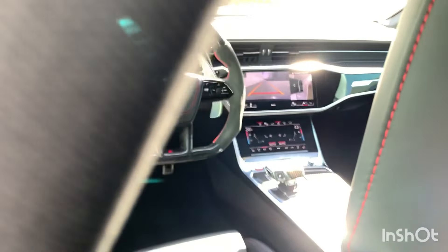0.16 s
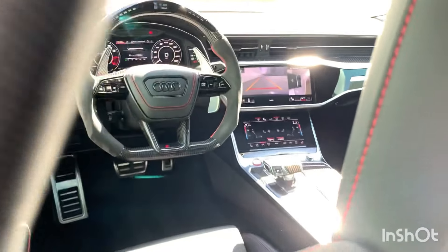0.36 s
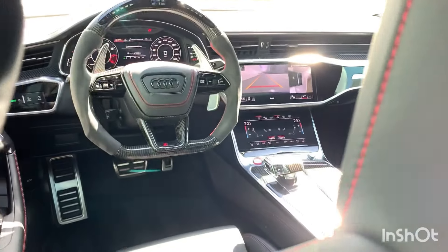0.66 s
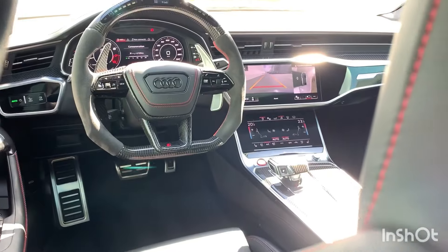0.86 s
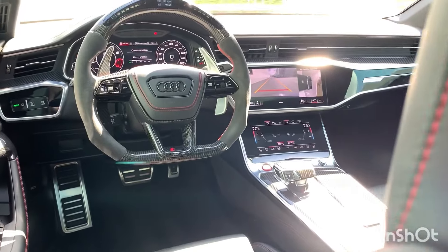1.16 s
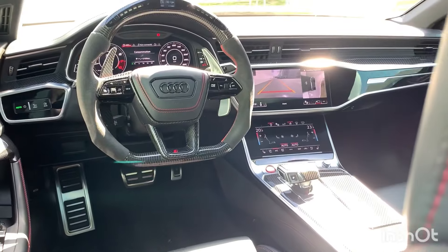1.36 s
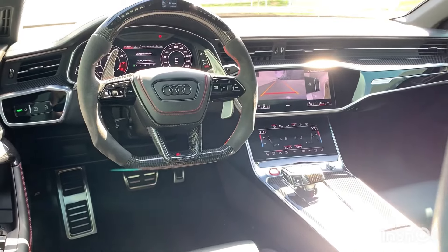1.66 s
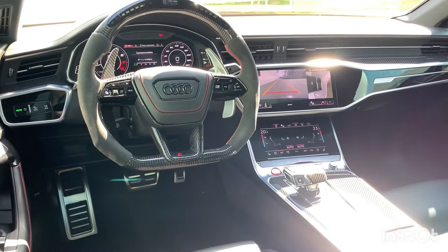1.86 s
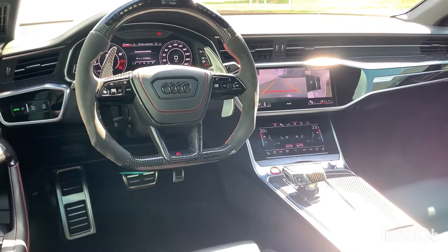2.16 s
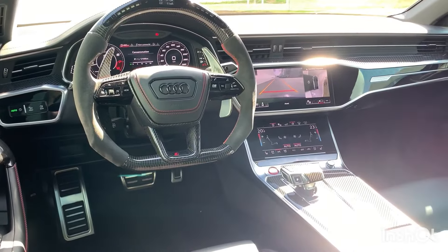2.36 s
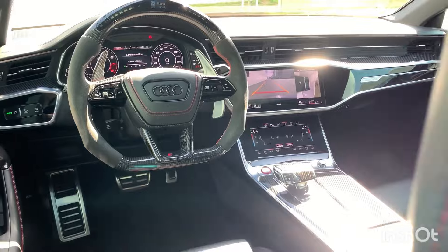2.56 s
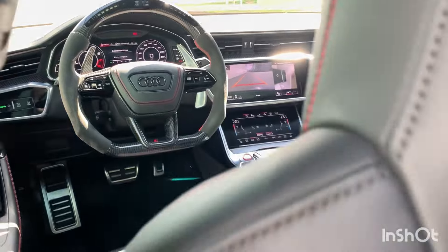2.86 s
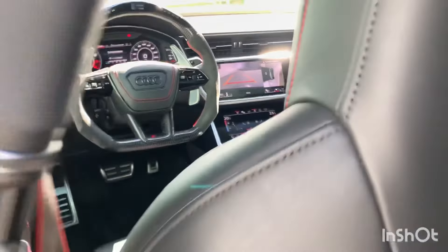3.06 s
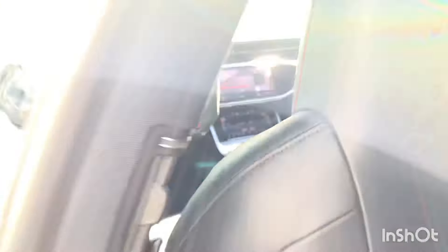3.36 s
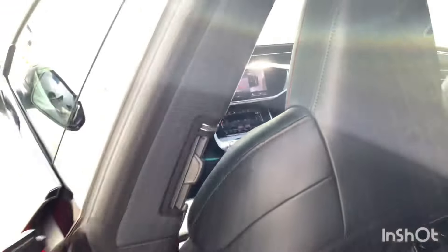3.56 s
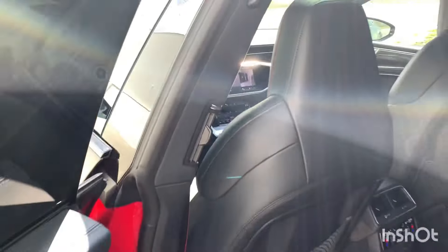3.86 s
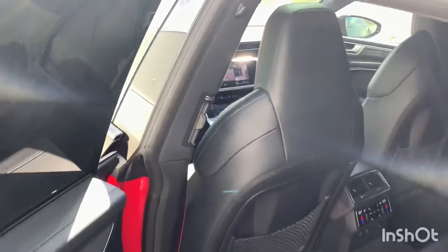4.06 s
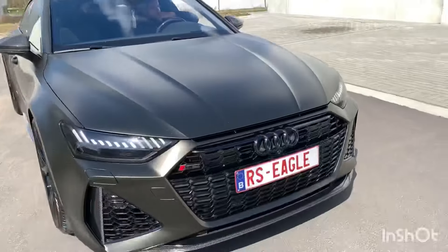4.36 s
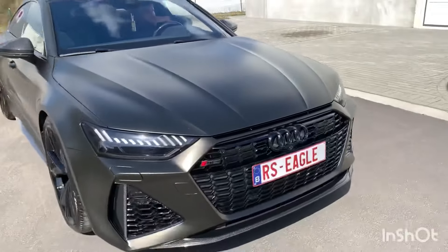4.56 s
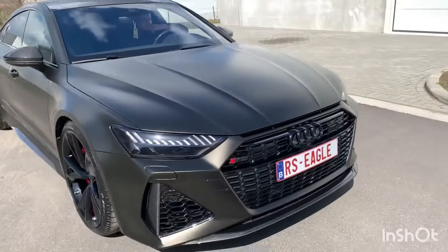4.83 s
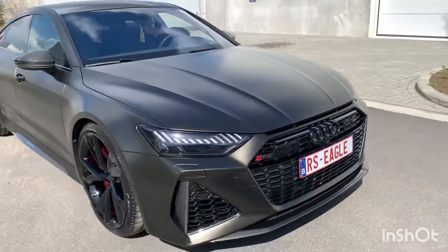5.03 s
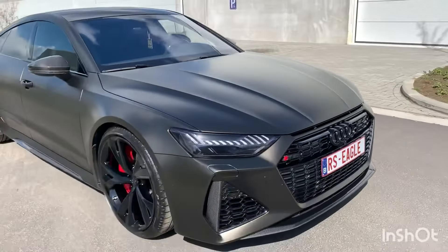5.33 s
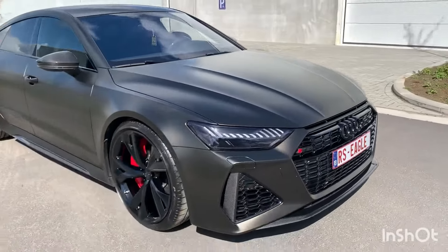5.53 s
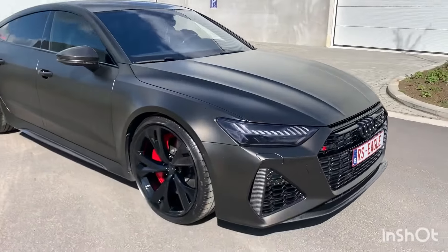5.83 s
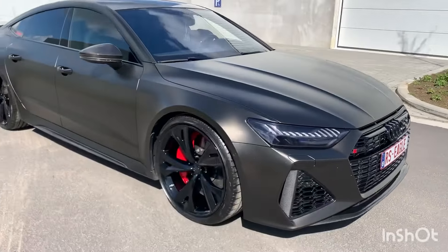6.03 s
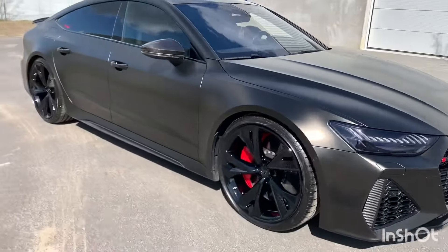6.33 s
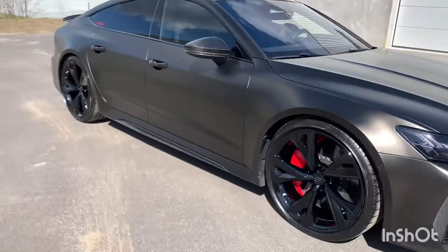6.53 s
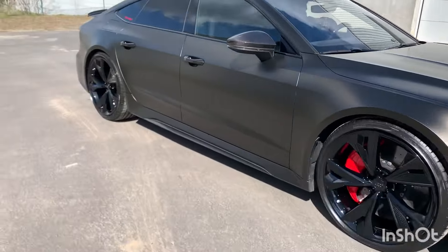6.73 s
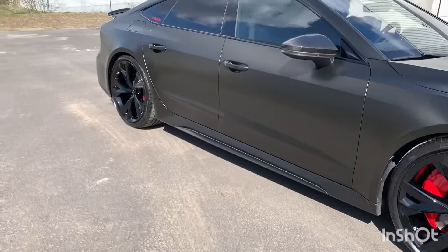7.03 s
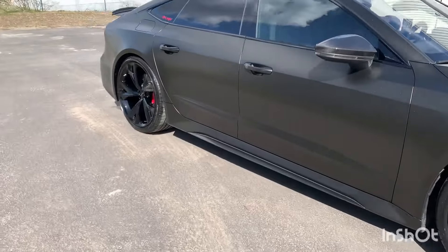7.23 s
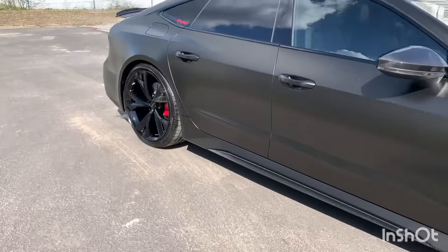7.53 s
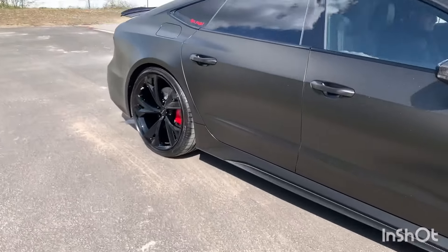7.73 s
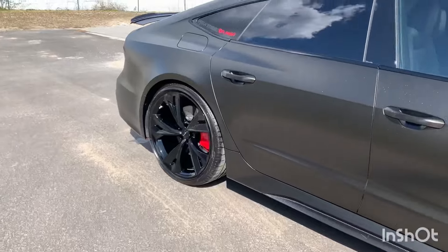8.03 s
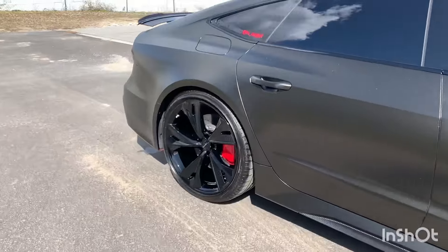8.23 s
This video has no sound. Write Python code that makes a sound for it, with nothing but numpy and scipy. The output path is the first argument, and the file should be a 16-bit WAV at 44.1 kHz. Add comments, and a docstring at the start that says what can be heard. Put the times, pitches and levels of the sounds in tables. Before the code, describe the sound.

A powerful eight-cylinder car idles throughout. First it is heard inside the cabin by the open door: low, boomy, loping burble, faint trim buzz, soft handling bumps and seat rustles. After a thump and hard cut at about four seconds, the close microphone is outside, walking from bonnet to rear wheel, with faster, louder exhaust throb, metallic clatter, hiss and late chattering metal.

```python
"""A V8 idles with a loping burble, heard in its cabin with the door open; after a hard cut it idles faster,
heard outside along a walk from the bonnet to the rear wheel. Beating exhaust orders make the burble; gas noise
and clatter, both shaped noise, surge with it; injectors and valve gear ring at the firings. Trim buzz and
rustles join in the cabin, soft bumps in both scenes; clanks and a chattering shield outside."""
import sys
import numpy as np
from scipy import signal
from scipy.fft import rfft, irfft, next_fast_len
from scipy.io import wavfile
from scipy.ndimage import uniform_filter1d, minimum_filter1d

SR = 44100
rng = np.random.default_rng(int(sys.argv[2]) if len(sys.argv) > 2 else 0)


def pcm_store(signal):
    """Save signal as 16-bit PCM."""
    levels = np.round(np.clip(np.atleast_2d(signal), -1, 1) * 32767)
    wavfile.write(sys.argv[1], SR, levels.astype(np.int16).T)


N = 369999
TIME = np.arange(N) / SR
CUT_S = 4.087


def gain_of(db):
    """Decibels to amplitude."""
    return 10 ** (np.asarray(db) / 20)


def evened(x):
    """Scales to rms 1."""
    return x / np.sqrt(np.mean(abs(x) ** 2) + 1e-20)


def read(points, hz):
    """Reads a spectrum on a log-frequency axis."""
    f, value = np.transpose(points)
    return np.interp(np.log(hz + 1), np.log(f + 1), value)


def curves(rows):
    """Each column of a table at every sample."""
    s, *columns = np.transpose(rows)
    return [np.interp(TIME, s, c) for c in columns]


def drift(per_s, t=TIME):
    """Random wander: straight lines between normal draws, per_s draws a second."""
    return np.interp(t * per_s, np.arange(1000), rng.standard_normal(1000))


def swell(center_s, half_length_s, db):
    """A smooth rise or dip in dB round one moment."""
    return db * np.exp(-((TIME - center_s) / half_length_s) ** 2)


def passing(sounds, places_s):
    """Equal-power move from the sound at one place to the sound at the next."""
    shares = [np.interp(TIME, places_s, share) for share in np.eye(len(sounds))]
    return sum(np.sqrt(share) * sound for sound, share in zip(sounds, shares))


def lean(right_db):
    """Channel gains for a source that is louder on the right by right_db."""
    return gain_of(np.array([[-1], [1]]) * right_db / 2)


def late_left(pair, samples):
    """A positive count delays the left port; a negative one advances it."""
    return np.array([np.interp(TIME - samples / SR, TIME, pair[0]), pair[1]])


def noise(colour, same, peaks=(), above_hz=600, lead_s=0, ripple_db=2.2):
    """Coloured noise at two ports, the left leading; their mean has rms 1 above above_hz."""
    size = next_fast_len(N)
    hz = np.fft.rfftfreq(size, 1 / SR)
    db = read(colour, hz)
    db = db + sum(lift / (1 + (2 * (hz - f) / width) ** 2) for f, width, lift in peaks)
    # reflections from nearby surfaces ripple the treble
    ripple = np.interp(hz / 24, np.arange(1000), rng.standard_normal(1000))
    db = db + ripple_db * np.clip(hz / 900, 0, 1) * ripple
    likeness = np.clip(read(same, hz), 0, .98)
    # the divisor keeps the colour in the mean of the two ports
    level = gain_of(db) / np.sqrt(1 + likeness * np.cos(2 * np.pi * hz * lead_s))
    a, b = rfft(rng.standard_normal((2, size))) * level
    mid, side = a * np.sqrt(1 + likeness), b * np.sqrt(1 - likeness)
    turn = np.exp(1j * np.pi * hz * lead_s)
    pair = np.array([(mid + side) * turn, (mid - side) / turn])
    return irfft(pair, size)[:, :N] / irfft(pair.mean(0) * (hz >= above_hz)).std()


def ring(hz, size=N, sharpness=7):
    """A cluster of close metal modes round one frequency, as narrow noise, different at each port."""
    b, a = signal.iirpeak(min(hz, SR / 2.2), sharpness, fs=SR)
    once = signal.lfilter(b, a, rng.standard_normal((2, size)))
    return evened(signal.lfilter(b, a, once))


# (engine speed in rpm, phase offset in two-turn cycles)
CABIN_IDLE, STREET_IDLE = (750.2, .89), (953, .266)
# the governor hunts: (swing in rpm, a moment of top speed in s)
CABIN_HUNT, STREET_HUNT, HUNT_PERIOD_S = (2.46, 0.082), (8.7, 4.57), 1.313


def engine_cycles(idle, hunt):
    """Count of two-turn cycles for a steady idle whose speed swings gently."""
    (rpm, phase), (swing_rpm, fastest_s) = idle, hunt
    pace = 2 * np.pi / HUNT_PERIOD_S
    surplus = swing_rpm / pace * np.sin(pace * (TIME - fastest_s))
    return phase + (rpm * TIME + surplus) / 120


def burble(cycles, orders, sizes):
    """The leading exhaust orders beat against each other; returns the pressure and its lope."""
    wave = sum(size * np.exp(2j * np.pi * order * cycles) for order, size in zip(orders, sizes))
    return np.sqrt(2) * wave.real, abs(wave) / uniform_filter1d(abs(wave), SR // 3)


def overtones(cycles, orders, places_s, waver, spread, step=10):
    """Weaker orders waver with uneven combustion; the pipes scatter the phase of those above 16."""
    t, out = TIME[::step], 0
    for order, *db in orders:
        scatter = rng.random() * (order > 16)
        angle = 2 * np.pi * (order * cycles[::step] + scatter) + waver * drift(5, t)
        # each port meets it at a slightly different phase
        apart = spread * order * rng.standard_normal()
        level = np.interp(t, places_s, gain_of(db)) * (1 + waver * drift(4, t))
        out = out + level * np.cos([angle + apart, angle - apart])
    full = signal.resample_poly(out, step, 1, axis=1, window=("kaiser", 13), padtype="edge")
    return np.sqrt(2) * full[:, :N]


def surge(cycles, lope, puff, follow, uneven_db=0.9):
    """Gain that swells at each of the eight firings and with the lope, never twice alike."""
    firing = np.cos(np.pi * 8 * cycles) ** 4
    lope_gain = (lope ** 2 + 0.25) ** (follow / 2)
    return evened((1 + puff * firing) * lope_gain * gain_of(uneven_db * drift(28)))


# Likeness of the two ports in the cabin. Each row: frequency in Hz, likeness (0 to 1).
CABIN_LIKENESS = [(60, 0.79), (170, 0.62), (330, 1), (650, 0.72), (1000, 0.56), (1600, 0.31), (4000, .15)]
# Times between the seats and at the door.
CABIN_PLACES_S = (2.65, 3)
CABIN_LEAD_S = 0.00021  # engine noise leads at the left port

# Weaker exhaust orders in the cabin. Each row: order (multiple of the engine cycle),
# level in dB rms between the seats, level in dB rms at the door, both before waver and lean.
CABIN_ORDERS = [(11, -39, -36), (12, -45, -45), (13, -44, -40), (14, -54, -43), (22, -50, -51),
                (23, -54, -49), (24, -45, -43), (26, -56, -47), (27, -53, -49), (28, -53, -49),
                (29, -51, -50), (30, -48, -44), (32, -46, -41), (33, -57, -53), (36, -51, -50),
                (37, -50, -50), (38, -52, -51), (48, -55, -51), (51, -58, -53), (53, -56, -56),
                (54, -58, -57), (56, -59, -58), (57, -58, -59), (59, -62, -60)]
# Standing wave, a row per leading order: level in dB at the door, level in dB in the middle, before lean.
CABIN_BOOM_DB = [(-20, -58), (-26.5, -31.5), (-29, -30.5)]
# Colour of the gas noise in the cabin. Each row: frequency in Hz, relative density in dB per Hz.
CABIN_GAS_COLOUR = [(15, -24), (30, -17), (55, -7), (85, -2), (120, -4), (160, -4), (225, -4.5),
                    (265, -12.5), (335, -7.5), (400, -15), (500, -20), (700, -41), (1500, -76)]
CABIN_BEAT_ORDERS = (8, 10, 16)
# (at the door, change toward the middle)
CABIN_GAS_DB, CABIN_RIGHT_DB = (-36, -3.5), (2, 2)


def cabin_exhaust(cycles, depth):
    """Exhaust boom fades toward the cabin's middle, with overtones and gas noise; also returns the lope."""
    sizes = [(1 - depth) * gain_of(door) + depth * gain_of(middle) for door, middle in CABIN_BOOM_DB]
    boom, lope = burble(cycles, CABIN_BEAT_ORDERS, sizes)
    gas_db, right_db = [door + change * depth for door, change in (CABIN_GAS_DB, CABIN_RIGHT_DB)]
    lines = overtones(cycles, CABIN_ORDERS, CABIN_PLACES_S, waver=0.2, spread=0.015)
    gas = noise(CABIN_GAS_COLOUR, CABIN_LIKENESS, above_hz=164) * gain_of(gas_db)
    gas = gas * surge(cycles, lope, puff=0.58, follow=0.095)
    return late_left((boom + lines + gas) * lean(right_db), 26.0), lope


# Clatter colour between the seats. Each row: frequency in Hz, relative density in dB per Hz.
SEAT_CLATTER = [(350, -29), (500, 0.5), (620, 0.5), (850, -5), (1200, -5), (1400, -8), (1650, -13.5),
                (1800, -16), (2600, -20.5), (3500, -42.5), (6000, -77.5)]
# Clatter colour at the door. Each row: frequency in Hz, relative density in dB per Hz.
DOOR_CLATTER = [(480, -33), (600, 9), (800, -4.5), (900, -2), (1150, -2.5), (1550, -3), (1850, -11.5),
                (2700, -16.5), (3500, -32), (6000, -85)]
# Engine and panel resonances in the cabin. Each row: frequency in Hz, width in Hz, lift in dB.
CABIN_PEAKS = [(990, 95, 6), (1193, 89, 2), (1704, 40, 7.5), (2010, 83, 4), (2540, 73, 9), (3000, 70, 0),
               (6460, 140, 5.5), (7640, 790, 9.5)]
SEAT_CLATTER_DB, DOOR_CLATTER_DB = -55, -49.5


def cabin_clatter(cycles, lope):
    """Engine clatter as resonant noise, passing from its colour at the seats to that at the door."""
    places = (SEAT_CLATTER, SEAT_CLATTER_DB), (DOOR_CLATTER, DOOR_CLATTER_DB)
    sounds = [noise(colour, CABIN_LIKENESS, CABIN_PEAKS, lead_s=CABIN_LEAD_S) * gain_of(db)
              for colour, db in places]
    return passing(sounds, (2.85, 3.75)) * surge(cycles, lope, puff=0.1, follow=0.24, uneven_db=2.0)


# Hiss colour in the cabin. Each row: frequency in Hz, relative density in dB per Hz.
CABIN_HISS_COLOUR = [(2000, -34.5), (3000, 0.5), (4000, -1.5), (5500, -3.5), (6800, -4), (8000, -18),
                     (11000, -12), (14500, -29.5)]
CABIN_HISS_DB = (-67, -8)  # (at the door, change toward the middle)


def cabin_hiss(depth):
    """Flickering high noise, weaker toward the middle of the cabin."""
    door_db, change_db = CABIN_HISS_DB
    hiss = noise(CABIN_HISS_COLOUR, CABIN_LIKENESS, CABIN_PEAKS)
    return hiss * gain_of(door_db + change_db * depth + .8 * drift(40)) * lean(-1.5)


TICK_LIMIT = 1.6  # cap on random variation, in standard deviations
# Valve gear ringing through the bulkhead. Each row: frequency in Hz, relative level in dB, t60 in seconds.
KNOCK_MODES = [(949, 1.5, 0.082), (1035, 6, 0.058), (1173, -1, 0.095), (1533, -3, 0.065), (1660, -15, 0.12)]
KNOCK_DB = -54.5


def knocks(cycles, uneven_db, scatter_db, slack_s):
    """Valves close about every firing, varied in time and strength, ringing the engine's covers."""
    beats = np.flatnonzero(np.diff(np.floor(cycles * 8)))
    chance = rng.standard_normal((1000, len(KNOCK_MODES) + 2))[:len(beats)]
    chance = np.clip(chance, -TICK_LIMIT, TICK_LIMIT)
    at = np.clip(beats + (slack_s * SR * chance[:, 0]).astype(int), 0, N - 1)
    t, out = np.arange(4000) / SR, np.zeros(N)
    for (hz, db, t60), share in zip(KNOCK_MODES, chance[:, 2:].T):
        blows = np.zeros(N)
        blows[at] = gain_of(uneven_db * chance[:, 1] + scatter_db * share)
        envelope = gain_of(db - 60 * t / t60) * (1 - np.exp(-t / 0.0026))
        out += signal.oaconvolve(blows, envelope * np.sin(2 * np.pi * hz * t))[:N]
    return late_left([evened(out)] * 2, -CABIN_LEAD_S * SR)


# A trim panel buzzes near the microphone: (centre in s, half length in s, dB per mode), modes in Hz.
TRIM_BUZZ, TRIM_HZ = (0.35, 0.72, -65), (1466, 1570, 1667)


def trim_buzz(cycles, lope):
    """A thin panel rings in uneven bursts, shaken by the engine's lope, each mode by its own amount."""
    center_s, half_length_s, db = TRIM_BUZZ
    modes = sum(ring(hz, sharpness=13) * surge(cycles, lope, puff=.8, follow=1.2, uneven_db=5)
                for hz in TRIM_HZ)
    return modes * gain_of(db) * np.exp(-((TIME - center_s) / half_length_s) ** 2)


def ticks(cycles, modes, uneven_db, lift_db, sharpness):
    """An injector tick rings at each firing; one a turn of the crank is nearer and louder."""
    firing = np.floor(cycles * 8)
    at = np.flatnonzero(np.diff(firing))
    near = firing[at] % 4 == 3
    chance = np.minimum(rng.standard_normal((1000, len(modes) + 1))[:len(at)], TICK_LIMIT)
    size_db = uneven_db * chance[:, 0] + lift_db * near
    t, out = np.arange(3000) / SR, np.zeros((2, N))
    for k, (hz, db, t60) in enumerate(modes):
        clicks = np.zeros(N)
        clicks[at] = gain_of(size_db + 2.9 * chance[:, k + 1])
        envelope = gain_of(db - 60 * t / t60) * (1 - np.exp(-t / 0.0072))
        out += signal.oaconvolve(clicks, envelope)[:N] * ring(hz, sharpness=sharpness)
    return evened(out)


# Injector ringing in the cabin. Each row: frequency in Hz, relative level in dB, t60 in seconds.
CABIN_TICK_MODES = [(2050, -0.5, .09), (2560, -3, 0.078), (3030, -6.5, 0.064), (4750, -12, 0.055),
                    (5450, -9, .06), (6500, -8.5, .07), (7280, -9.5, .06)]
CABIN_TICK_DB = (-76.5, -64.5)  # between the seats, at the door


def cabin_injectors(cycles):
    """Injector ticks, louder at the door than between the seats."""
    injectors = ticks(cycles, CABIN_TICK_MODES, uneven_db=1.5, lift_db=4, sharpness=40)
    return injectors * gain_of(np.interp(TIME, CABIN_PLACES_S, CABIN_TICK_DB))


# The microphone leans in and backs out.
# Each row: time in seconds, depth (0 at the door, 1 at the quiet middle of the cabin).
DEPTH = [(0, 0.48), (.45, 0.45), (1.2, 0.7), (1.8, 0.93), (2.25, 1), (3.55, 0.012)]


def cabin():
    """Slow idle in the cabin, its sources following the microphone's depth and place."""
    cycles = engine_cycles(CABIN_IDLE, CABIN_HUNT)
    depth = np.clip(curves(DEPTH)[0], 0, 1)
    exhaust, lope = cabin_exhaust(cycles, depth)
    valves = knocks(cycles, uneven_db=3.5, scatter_db=3.5, slack_s=.003) * gain_of(KNOCK_DB)
    engine = exhaust + cabin_clatter(cycles, lope) + valves + cabin_injectors(cycles)
    return engine + cabin_hiss(depth) + trim_buzz(cycles, lope) + rustles()


# Light brushes against the seat. Each row: centre in seconds, level in dB before grain, length in seconds.
RUSTLES = [(1.11, -64, 0.17), (3.655, -66, 0.04), (3.947, -68.5, .35), (4.016, -60, 0.054)]


def rustles():
    """Brief grainy strokes of high noise."""
    level = sum(gain_of(db) * np.exp(-(2 * (TIME - center_s) / length_s) ** 2)
                for center_s, db, length_s in RUSTLES)
    colour = [(1000, -24), (2500, 3.0), (5000, -1.5), (7000, 0.0), (10500, -8.5), (14500, -9)]
    brush = noise(colour, CABIN_LIKENESS, [(4900, 600, 6), (9750, 800, 7.8)])
    return level * gain_of(3.0 * drift(90)) * brush


# Soft bumps against the microphone.
# Each row: start in seconds, level in dB before the envelope, pitch in Hz, decay in seconds.
BUMPS = [(1.184, -9.5, 138, 0.01), (1.443, -33, 72, .025), (1.517, -2, 101, 0.0091),
         (3.53, -20, 137, 0.033), (4.224, 5.5, 111, .012), (4.225, -26, 258, 0.049),
         (4.279, -15, 310, 0.0078)]


def bumps():
    """Short, heavily damped thuds."""
    out = np.zeros(N)
    for start_s, db, hz, decay_s in BUMPS:
        t = np.maximum(TIME - start_s, 0)
        envelope = np.exp(-t / decay_s) * (1 - np.exp(-t / 0.016))
        out += gain_of(db) * np.sin(2 * np.pi * hz * t) * envelope
    return out


def splice():
    """The hard cut leaves a step in pressure: one dry click."""
    t = TIME - CUT_S
    return gain_of(-14.0) * (t >= 0) * np.exp(-abs(t) / .0015)


# Times at the grille, the front wheel, the door and the rear wheel, in seconds.
WALK_S = [4.1, 5.75, 6.85, 8.1]


def on_walk(values):
    """A value given at the four places of the walk, at every sample."""
    return np.interp(TIME, WALK_S, values)


# Likeness of the two ports outside. Each row: frequency in Hz, likeness (0 to 1).
STREET_LIKENESS = [(60, 0.75), (400, 0.83), (700, 0.39), (1000, .8), (1400, 0.39), (4000, 0.24)]
# Bonnet resonances. Each row: frequency in Hz, width in Hz, lift in dB.
BONNET_PEAKS = [(1016, 186, 11), (1728, 58, 5.7), (2100, 59, 4.3), (2350, 65, 2.6), (3700, 310, 2.9)]
BONNET_LEAD_S, SILL_LEAD_S = .00014, 0.00026  # lead at the left port
# Times when the microphone is closest to the bonnet, wheel, flank and sill.
STREET_PLACES_S = (4.95, 5.95, 6.7, 8.0)


def walk_noise(bonnet, further, above_hz, places_s=(5.7, 6.8)):
    """One noise, changing colour from the bonnet to the places further along the side."""
    front = noise(bonnet, STREET_LIKENESS, BONNET_PEAKS, above_hz, BONNET_LEAD_S)
    side = [noise(colour, STREET_LIKENESS, (), above_hz, SILL_LEAD_S) for colour in further]
    return passing([front] + side, places_s)


# Weaker exhaust orders outside. Each row: order (multiple of the engine cycle), level in dB rms
# at the grille, the front wheel, the door and the rear wheel, before waver and lean.
STREET_ORDERS = [(5, -41, -39, -34, -33), (7, -46, -36, -34, -36), (9, -54, -33, -34, -36),
                 (10, -29, -30, -33, -33), (12, -31, -33, -35, -30), (14, -29, -32, -34, -33),
                 (15, -34, -38, -35, -28), (16, -28, -30, -28, -28), (17, -41, -38, -39, -33),
                 (18, -44, -41, -36, -36), (19, -39, -40, -36, -35), (20, -47, -41, -43, -43),
                 (21, -45, -45, -37, -35), (24, -60, -54, -49, -42), (29, -50, -52, -45, -45),
                 (32, -46, -43, -48, -43), (33, -53, -45, -51, -47), (34, -55, -51, -52, -52),
                 (35, -51, -42, -49, -46), (36, -53, -49, -61, -59), (38, -53, -48, -55, -53),
                 (40, -58, -61, -51, -50), (41, -50, -49, -58, -70), (42, -64, -50, -57, -51),
                 (43, -52, -50, -54, -52), (48, -49, -45, -55, -61), (49, -50, -51, -59, -51),
                 (52, -57, -54, -75, -63), (53, -58, -51, -59, -54), (58, -54, -55, -74, -56),
                 (59, -58, -64, -63, -55), (66, -63, -64, -62, -59), (69, -59, -65, -67, -63),
                 (70, -68, -68, -63, -59), (71, -55, -62, -62, -61)]
# Leading orders, a row each: level in dB at the grille, front wheel, door and rear wheel, before lean.
STREET_BOOM_DB = [(-15, -13.5, -14, -12.5), (-16, -18, -12, -13.5), (-28, -35.5, -19.5, -16)]
# Gas noise colour at the bonnet. Each row: frequency in Hz, relative density in dB per Hz.
BONNET_GAS = [(12, -16), (30, -14), (45, 3), (65, 7), (90, 7), (120, 5), (160, 0), (205, -4), (265, -6),
              (330, -8), (400, -9.5), (500, -16), (700, -35), (1500, -65)]
# Gas noise colour at the sill. Each row: frequency in Hz, relative density in dB per Hz.
SILL_GAS = [(12, -10), (28, -5), (45, -6), (65, 0), (90, 1), (120, -2), (160, -6), (205, -8.5), (265, -12),
            (330, -15), (400, -16), (500, -19), (700, -35), (1500, -60)]
STREET_BEAT_ORDERS = (8, 11, 13)
STREET_GAS_DB = (-37.5, -38, -44, -38)  # at the walk's four places, before the flare
GAS_FLARE = (4.25, 0.074, 7.5)  # (centre in s, half length in s, rise in dB)


def street_exhaust(cycles):
    """Exhaust burble, overtones and gas noise, which flares once; also returns the lope."""
    boom, lope = burble(cycles, STREET_BEAT_ORDERS, [gain_of(on_walk(db)) for db in STREET_BOOM_DB])
    lines = overtones(cycles, STREET_ORDERS, STREET_PLACES_S, waver=0.13, spread=0.005)
    gas = walk_noise(BONNET_GAS, [SILL_GAS], above_hz=204)
    gas = gas * gain_of(on_walk(STREET_GAS_DB) + swell(*GAS_FLARE))
    gas = gas * surge(cycles, lope, puff=0.7, follow=0.3, uneven_db=1.1)
    # the leading orders swing against the weaker ones, which fills the gaps between their beats
    pipes = late_left(-boom * lean(3.53) + lines * lean(3.3), -13)
    return pipes + gas * lean(1.2), lope


# Clatter colour at the bonnet. Each row: frequency in Hz, relative density in dB per Hz.
BONNET_CLATTER = [(350, -18.5), (550, 2.5), (650, -3), (900, -3), (1100, -2.5), (1350, -9), (1700, -7),
                  (2500, -14.5), (3000, -17.5), (4000, -38), (6000, -76)]
# Clatter colour at the front wheel. Each row: frequency in Hz, relative density in dB per Hz.
WHEEL_CLATTER = [(400, -19), (555, -2.5), (640, -8.5), (786, -5), (1110, -0.5), (1590, -11.5), (2210, -17),
                 (2460, -11.5), (2960, -26), (5200, -62.5)]
# Clatter colour at the flank. Each row: frequency in Hz, relative density in dB per Hz.
FLANK_CLATTER = [(400, -24), (545, -4.5), (649, -6), (853, -4), (944, -0.5), (1190, -12), (1290, -7.5),
                 (1660, -15), (2530, -14.5), (2900, -26.5), (5200, -59)]
# Clatter colour at the sill. Each row: frequency in Hz, relative density in dB per Hz.
SILL_CLATTER = [(380, -23.5), (530, 1.5), (637, -15), (692, -0.5), (885, -8), (970, -3.5), (1130, -9.5),
                (1560, -11.5), (1690, -20), (2330, -15.5), (3000, -23.5), (5200, -58.5)]
STREET_CLATTER_DB = (-39.5, -42.5, -42.5, -41.5)  # at the walk's four places, before lean


def street_clatter(cycles, lope):
    """Engine clatter as noise whose colour changes along the side."""
    further = [WHEEL_CLATTER, FLANK_CLATTER, SILL_CLATTER]
    clatter = walk_noise(BONNET_CLATTER, further, 400, STREET_PLACES_S)
    clatter = clatter * gain_of(on_walk(STREET_CLATTER_DB)) * lean(-0.61)
    return clatter * surge(cycles, lope, puff=0.2, follow=0.15, uneven_db=1.18)


# Hiss colour at the bonnet. Each row: frequency in Hz, relative density in dB per Hz.
BONNET_HISS = [(2000, -34), (3000, -3.5), (3900, 2.5), (5500, -5.5), (7400, -8.5), (10000, -16),
               (14500, -11)]
# Hiss colour at the sill. Each row: frequency in Hz, relative density in dB per Hz.
SILL_HISS = [(2000, -32), (3000, 2.5), (3900, 1.5), (5200, -2.5), (7200, -5.5), (10000, -11), (14500, -5.5)]
STREET_HISS_DB = (-54, -56.5, -55, -50.5)  # at the walk's four places, before lean


def street_hiss(cycles, lope):
    """High noise surging with the engine, its colour passing from bonnet to sill."""
    hiss = walk_noise(BONNET_HISS, [SILL_HISS], above_hz=1800)
    hiss = hiss * gain_of(on_walk(STREET_HISS_DB)) * lean(-0.61)
    return hiss * surge(cycles, lope, puff=0.2, follow=0.15, uneven_db=1.5)


# Injector ringing outside. Each row: frequency in Hz, relative level in dB, t60 in seconds.
STREET_TICK_MODES = [(2420, -8.5, 0.065), (2744, 0, 0.041), (3380, -1, 0.043), (5860, -6, 0.045),
                     (7180, -5.5, 0.052), (10200, -6.5, 0.063), (13300, -9, 0.031)]


def street_injectors(cycles):
    """Injector ticks, 1.5 dB under the hiss setting along the walk."""
    injectors = ticks(cycles, STREET_TICK_MODES, uneven_db=1.0, lift_db=1.5, sharpness=11)
    return injectors * gain_of(on_walk(STREET_HISS_DB) - 1.5)


def street():
    """Faster idle in the open, its levels and colours changing along the walk."""
    cycles = engine_cycles(STREET_IDLE, STREET_HUNT)
    exhaust, lope = street_exhaust(cycles)
    engine = exhaust + street_clatter(cycles, lope) + street_hiss(cycles, lope)
    return engine + street_injectors(cycles) + clanks() + rattles()


# Single clanks from the engine's covers.
# Each row: start in seconds, level in dB before the envelope, pitch in Hz.
CLANKS = [(4.252, -29, 980), (7.807, -35.5, 986), (7.96, -30.5, 977)]


def clanks(attack_s=.002, decay_s=.014):
    """A cover is struck once and rings briefly."""
    out = 0
    for start_s, db, hz in CLANKS:
        t = np.maximum(TIME - start_s, 0)
        envelope = (1 - np.exp(-t / attack_s)) * np.exp(-t / decay_s)
        out = out + gain_of(db) * envelope * ring(hz, sharpness=9.8)[0]
    return out


# A loose metal shield chatters under the car.
# Each row: centre in seconds, level in dB before RATTLE_GAIN_DB, pitch in Hz.
RATTLES = [(7.31, -36, 2620), (7.379, -42, 2500), (7.442, -36, 2650), (7.506, -44, 2550),
           (7.561, -36.5, 2620), (7.61, -41, 2580), (7.644, -42, 2560), (7.685, -41, 2600),
           (7.76, -43, 2420), (7.81, -34, 2560), (7.862, -42, 2800), (7.937, -37, 2780), (7.967, -44, 2360),
           (8.019, -37, 2820), (8.065, -39, 2730), (8.098, -33.5, 2340), (8.147, -37.5, 2310),
           (8.192, -39, 2320), (8.274, -36.5, 2330), (8.32, -43, 2550)]
# Modes of the shield. Each row: multiple of the pitch, relative level in dB.
SHIELD_MODES = [(1, 3), (.92, -6), (1.3, -13), (2.25, -12), (2.8, -12)]
RATTLE_GAIN_DB, RATTLE_HALF_S, RATTLE_GRAIN_DB = -6.5, .013, 3


def rattles():
    """Each chatter is a short, gritty burst that rings all the modes of the thin shield."""
    out, t = np.zeros((2, N)), np.arange(-3000, 3000) / SR
    for center_s, db, hz in RATTLES:
        metal = evened(sum(gain_of(mode_db) * ring(hz * ratio, size=len(t), sharpness=14)
                           for ratio, mode_db in SHIELD_MODES))
        grit = evened(gain_of(RATTLE_GRAIN_DB * drift(450, t - t[0])))
        burst = gain_of(db + RATTLE_GAIN_DB) * np.exp(-(t / RATTLE_HALF_S) ** 2) * grit * metal
        part = out[:, round((center_s + t[0]) * SR):][:, :len(t)]
        part += burst[:, :part.shape[1]]
    return out


def scene():
    """Cabin, cut, then the street, which comes in over 18 ms."""
    cabin_in = np.clip(TIME / .006, 0, 1) ** 2
    street_in = np.clip((TIME - CUT_S) / 0.018, 0, 1)
    return cabin() * cabin_in * (TIME < CUT_S) + street() * street_in + bumps() + splice()


EDGE_HZ = 14600


def record(dry):
    """A smooth limiter holds the strongest peaks; then a low-pass sets the band limit."""
    room = np.minimum(1, .92 / (abs(dry).max(0) + 1e-9))
    gain = uniform_filter1d(uniform_filter1d(minimum_filter1d(room, 801), 401), 401)
    lowpass = signal.firwin(511, EDGE_HZ, window=("kaiser", 9), fs=SR)
    return signal.oaconvolve(dry * gain, lowpass[None], "same")


dry = scene()
out = record(dry)
pcm_store(out)
```